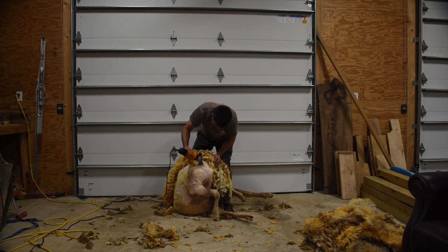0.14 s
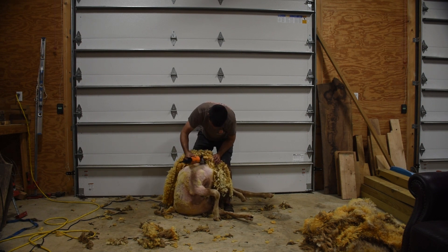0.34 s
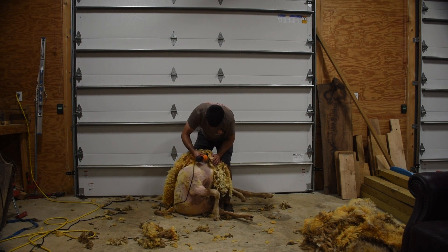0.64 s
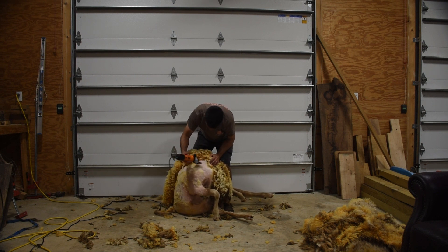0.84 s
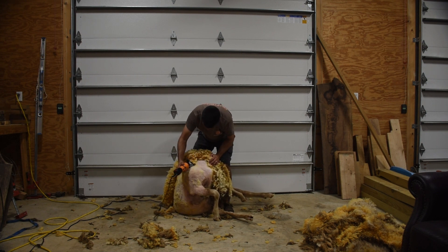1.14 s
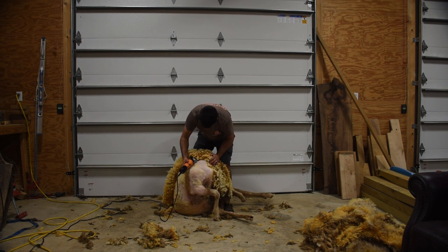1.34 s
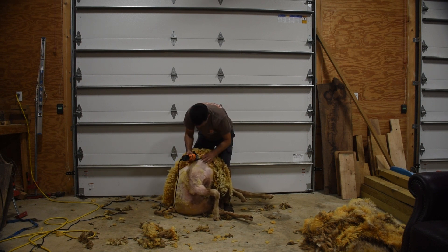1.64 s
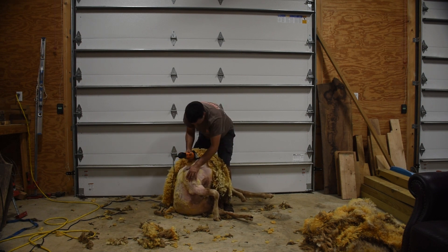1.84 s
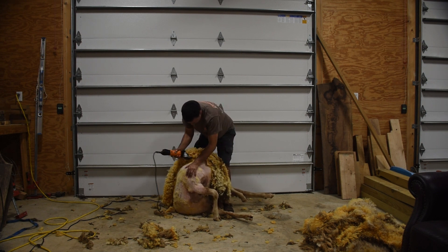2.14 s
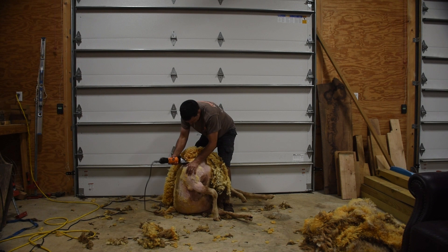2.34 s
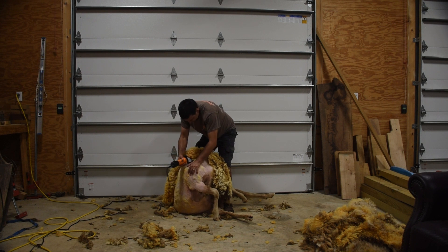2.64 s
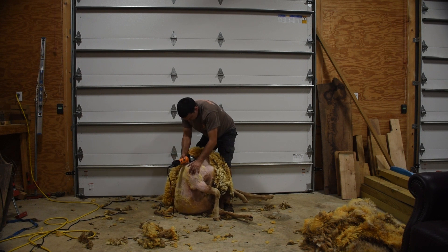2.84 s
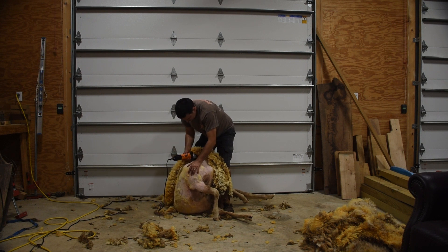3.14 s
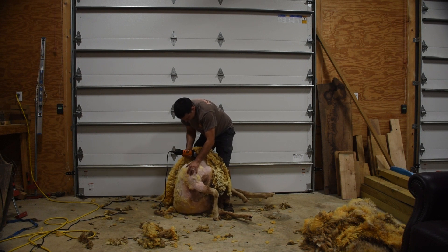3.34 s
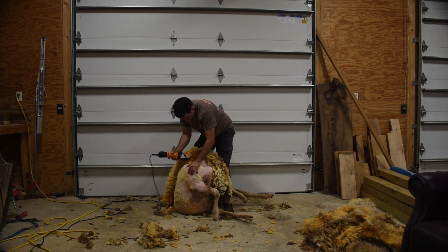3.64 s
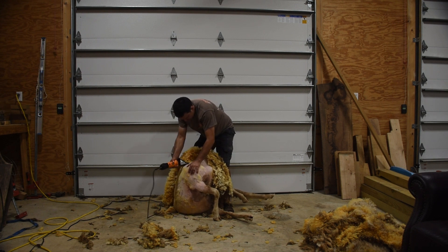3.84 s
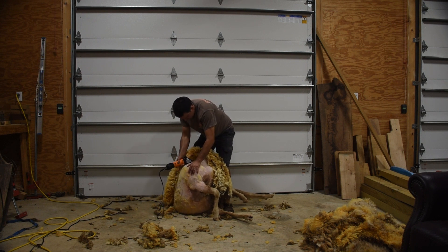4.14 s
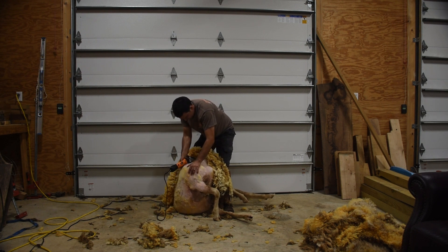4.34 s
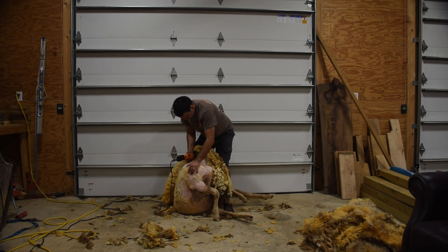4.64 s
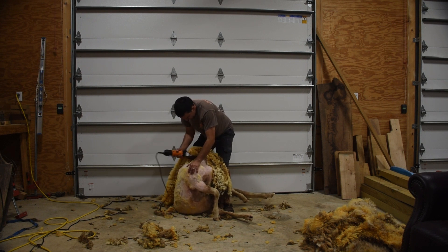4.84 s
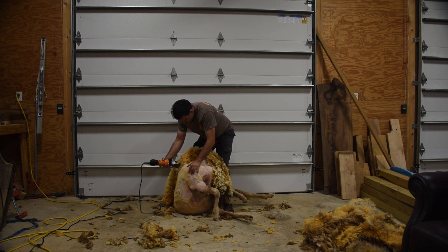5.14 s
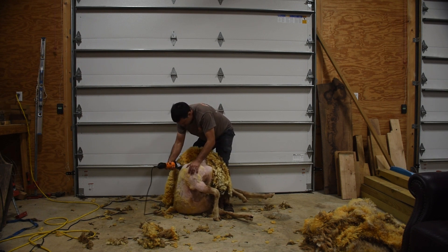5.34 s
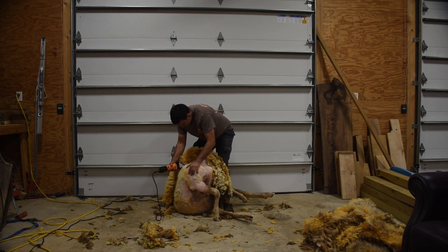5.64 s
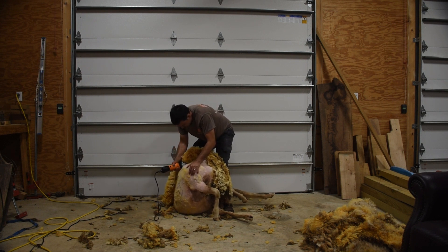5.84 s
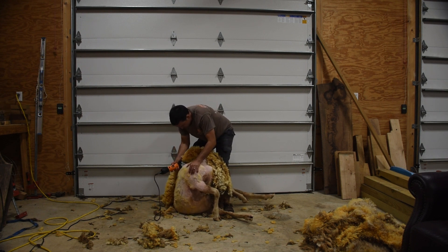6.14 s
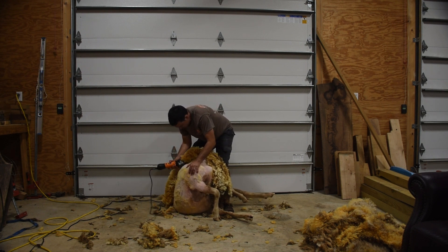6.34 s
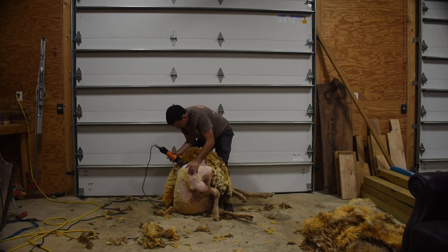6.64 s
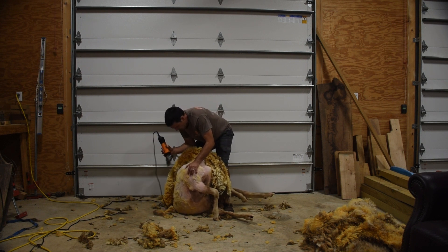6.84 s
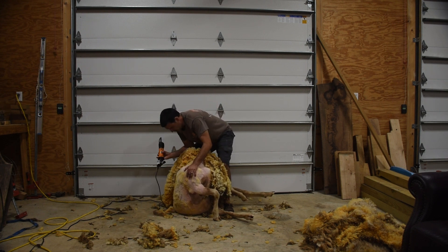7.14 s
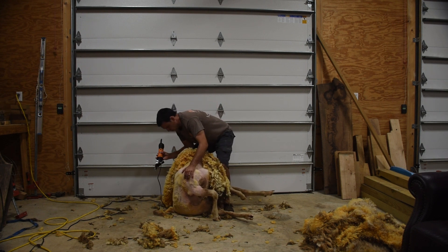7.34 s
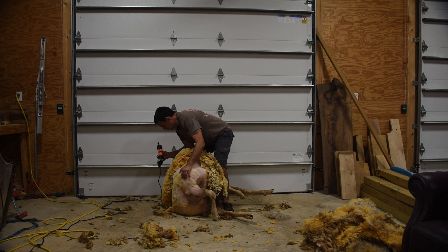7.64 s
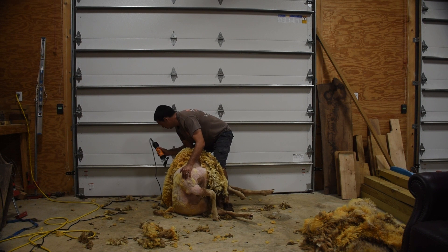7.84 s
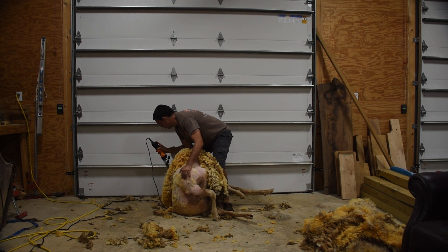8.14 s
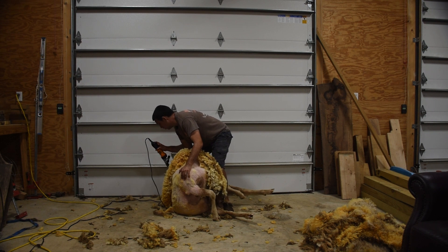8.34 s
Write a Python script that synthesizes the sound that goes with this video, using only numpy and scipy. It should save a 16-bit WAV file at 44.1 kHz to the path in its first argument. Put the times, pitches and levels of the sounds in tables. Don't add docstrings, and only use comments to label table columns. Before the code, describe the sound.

Electric sheep shears run from start to end a few metres away in a hard-floored barn: a piercing gear whine over a bright, scraping metal rattle. The pitch dips slightly under load and recovers, with quick flutters as the tool turns. Two faint hoof thumps come early. In the last half second an animal out of view howls, falling in pitch, and tiny metal ticks rattle.

```python
import sys
import numpy as np
from scipy import signal
from scipy.fft import rfft, irfft, next_fast_len
from scipy.io import wavfile
from scipy.ndimage import uniform_filter1d

SR = 44100
rng = np.random.default_rng(int(sys.argv[2]) if len(sys.argv) > 2 else 0)


def makeup_ratio(level_db):
    decades = np.asarray(level_db, float) / 20
    return 10 ** decades


def store_pcm(level_fs):
    pcm = np.round(np.clip(level_fs, -1, 1) * 32767).astype(np.int16)
    wavfile.write(sys.argv[1], SR, np.atleast_2d(pcm).T)


N = 374842

WHEEL_TEETH, PINION_TEETH = 50, 6
CLATTER_DB = -15

# time in seconds, tooth mesh pitch in Hz.
MOTOR_SPEED = [(0, 2038), (.38, 2073), (.86, 2007), (1.2, 2053), (1.6, 2010), (2.03, 1978), (2.56, 2019),
               (3.27, 1847), (3.5, 1850), (3.88, 1951), (4.14, 1966), (4.52, 1872), (5.1, 1960),
               (5.47, 1991), (5.97, 1926), (6.5, 1968), (7.7, 2041), (8.5, 2033)]
# time in seconds, how far the comb is clear of the wool in dB,
# how far the casing faces us in dB, cutter drag on the crank in dB.
HAND_TURNS = [(0, 2.5, -2.5, 12), (.45, 1, -0.5, 8.5), (1, 5, -8, 2), (1.3, 2.5, 4, 1), (1.6, 4.5, -4, 12),
              (1.85, 3.5, 0.5, -13), (2.2, 1, -1.5, 1), (3.3, 0.5, 2, 3), (3.97, 2.5, -1, 7.5),
              (4.25, 2, 2, 2.5), (4.6, 0, -3, 4), (5.55, 1, 4, 4), (6.35, 2, -4, 6), (6.7, 6.5, -6.5, 2),
              (7.1, 3.5, 0, -12), (7.65, 2, 4, -6), (8.3, 3, -2.5, 7), (8.5, 2, -9, 3)]
STEADY_ORDERS = [9, WHEEL_TEETH / PINION_TEETH, 25, 102]
STEADY_DB = [-58.5, -54.5, -52.5, -42]
# time in seconds, width in seconds, loss in dB.
HOUSING_HIDDEN = [(.09, .025, 7), (.615, .022, 17), (.79, .04, 14), (.945, .02, 11), (1.165, .022, 15),
                  (1.385, .04, 15), (1.74, .065, 15), (1.99, .055, 7), (2.375, .03, 13), (2.51, .035, 10),
                  (2.73, .033, 15), (3.09, .06, 7), (3.31, .1, 15), (3.64, .1, 12), (3.88, .07, 7),
                  (4.075, .03, 10), (4.29, .1, 16), (4.61, .05, 10), (4.79, .055, 16), (5.08, .04, 10),
                  (5.355, .028, 18), (5.57, .07, 7), (5.79, .055, 15), (6.49, .04, 14), (6.81, .09, 21),
                  (7.06, .09, 8), (7.31, .11, 6), (7.88, .2, 2.5), (8.295, .033, 17), (8.47, .07, 18)]
# time in seconds, width in seconds, rise in dB.
THIRD_MESH_AIMED = [
    (.7, .06, 8),
    (1.6, .12, 8),
    (3.29, .09, 8),
    (3.55, .06, 3),
    (4.39, .03, 7),
    (4.76, .08, 5),
    (5.58, .08, 8),
    (6.2, .2, 5),
    (6.9, .1, 8),
    (7.65, .12, 10),
]
# time in seconds, width in seconds, rise in dB.
LOW_TONE_AIMED = [
    (.3, .3, 5),
    (1.35, .15, 6),
    (3.2, .1, 6),
    (4.25, .17, 5),
    (6.0, .25, 9),
]
# time in seconds, width in seconds, rise in dB.
SHAFT_AIMED = [
    (.8, .1, 4.8),
    (2.02, .1, 17),
    (3.0, 0.13, 12),
    (5.25, .1, 9.5),
    (6.6, 0.086, 9.5),
    (8.35, 0.17, 16),
]
# time in seconds, width in seconds, rise in dB.
HANDLE_TURNED = [
    (.8, 0.072, 9),
    (2.55, .2, 8.5),
    (3.4, .1, 7.5),
    (3.8, .1, 7),
    (5.12, .12, 10),
    (5.65, 0.11, 18.5),
    (6.0, 0.19, 14),
    (7.75, .2, 9),
]
# time in seconds, width in seconds, rise in dB.
ABOVE_MESH_AIMED = [
    (.4, .1, 8),
    (2.15, 0.11, 12),
    (2.8, 0.16, 15),
    (6.05, 0.11, 6.9),
    (6.55, .12, 6),
    (8.33, 0.079, 4.4),
]
# time in seconds, width in seconds, rise in dB.
YOKE_TURNED = [
    (1.45, 0.12, 19),
    (7.75, 0.26, 16.4),
]
# time in seconds, width in seconds, rise in dB.
TWICE_MESH_AIMED = [
    (.5, .3, 4),
    (1.0, .06, 6),
    (5.9, .15, 4),
    (7.9, 0.39, 8.4),
]
# pitch in Hz, level in dB.
FAN_TONES = [
    (80.7, -82),
    (247.6, -55),
]

PART_HZ = [1250, 2680, 2900, 4700]
PART_COMB = [0, 0.18, 0.69, 0]
PART_CASING = [0.084, 0, 0.15, 0.22]
PART_SAG = [0.094, -0.57, -0.23, 0.82]
PART_SWAY = [0.15, 0.5, 0.52, 0.74]
# frequency in Hz, level in dB per Hz.
CLATTER_COLOUR = [(40, -40), (300, -27), (650, -16.5), (1350, -11.5), (1800, -14), (2080, -6.5),
                  (2500, -7.5), (3200, -3.5), (3800, -8), (5500, -10), (6800, -18.5), (9400, -31),
                  (12100, -32.5), (15500, -45.5)]
# frequency in Hz, share that repeats (0 to 1).
TURN_REPEAT = [(150, 0.049), (400, 0.19), (1500, 0.13), (2500, 0.26), (3500, 0.053), (6000, 0.036)]
# frequency in Hz, depth (0 to 1).
STROKE_DEPTH = [(1500, 0.04), (3000, 0.076), (6000, 0.18), (12000, 0.17)]
# frequency in Hz, side minus mid in dB.
CLATTER_WIDTH = [(60, -31), (110, -29), (200, -25), (380, -17), (700, -58), (1290, -25), (2380, -13.5),
                 (4400, -17), (8120, -8), (15000, -4.5)]
# pitch in Hz, width in Hz, level in dB.
COMB_MODES = [
    (2360, 100, -13.5),
    (2890, 47, -3),
    (2945, 190, -4),
    (3050, 37, -4.5),
    (3272, 104, -4),
    (3404, 55, -12.5),
    (4210, 79, -13.5),
]

# time in seconds, peak in dB, pitch in Hz.
HOOF_THUMPS = [
    (2.539, -44, 110),
    (2.974, -41, 105),
]
# time in seconds, pitch in Hz, level in dB.
HOWL_PATH = [
    (7.92, 803, -42),
    (7.98, 795, -30),
    (8.12, 778, -28),
    (8.19, 760, -20),
    (8.26, 738, -21),
    (8.3, 725, -15),
    (8.4, 709, -17),
    (8.5, 688, -17),
]
# time in seconds, width in seconds, loss in dB.
HOWL_DIPS = [
    (8.045, 0.025, 16),
    (8.158, 0.0083, 20),
    (8.225, 0.011, 14),
    (8.327, .01, 12),
    (8.4, 0.01, 3),
]
# time in seconds, peak in dB, pitch in Hz.
METAL_TICKS = [
    (8.3804, -28, 14100),
    (8.3944, -31, 13000),
    (8.4084, -36, 12400),
]


def rms_one(x):
    return x / np.sqrt(np.mean(x ** 2) + 1e-20)


def in_time(rows):
    s, *columns = np.transpose(rows)
    return [np.interp(np.arange(N) / SR, s, column) for column in columns]


def at_hz(points, hz):
    table_hz, values = np.array(points).T
    return np.interp(np.log(hz), np.log(table_hz), values)


def drift(rate):
    r = np.exp(-80 * np.pi * rate / SR)
    noise = rng.standard_normal(N // 40 + 2002)
    slow = signal.lfilter([1], [1, -2 * r, r * r], noise)[2000:]
    return np.interp(np.arange(N) / 40, np.arange(len(slow)), rms_one(slow))


def moments(rows):
    t = np.arange(0, N + 64, 64) / SR
    total_db = sum(db * np.exp(-.5 * ((t - s) / width) ** 2) for s, width, db in rows)
    return np.repeat(total_db, 64)[:N]


def tone(turns, level_db, sway_db, wobble):
    phase = 2 * np.pi * (turns + rng.random()) + wobble * drift(9.3)
    return np.sqrt(2) * makeup_ratio(level_db + sway_db * drift(5.4)) * np.sin(phase)


def whine(crank, sag, casing_db, drag_db):
    mesh = WHEEL_TEETH * crank
    mesh_db = -21.5 - moments(HOUSING_HIDDEN) + 1.3 * drift(16)
    out = tone(mesh, mesh_db, sway_db=.7, wobble=.4)
    out += tone(mesh - 2 * crank, -36 + drag_db, sway_db=2.5, wobble=.4)
    third_db = -47.5 + 8 * sag + moments(THIRD_MESH_AIMED)
    out += tone(3 * mesh, third_db, sway_db=2.5, wobble=.8)
    shaft = 2 * WHEEL_TEETH / PINION_TEETH
    minor = [([10], -56, 2.5, LOW_TONE_AIMED),
             ([shaft], -51.5, 1, SHAFT_AIMED),
             ([52, 54], -39, -2, ABOVE_MESH_AIMED),
             ([27], -53.5, 1, HANDLE_TURNED),
             ([42], -49, 0, YOKE_TURNED),
             ([98, 100], -40.5, -1, TWICE_MESH_AIMED)]
    for orders, free_db, per_sag, aimed in minor:
        level_db = free_db + per_sag * sag + moments(aimed)
        for order in orders:
            out += tone(order * crank, level_db, sway_db=2.5, wobble=.4)
    for order in range(32, 36):
        out += tone(order * crank, -43.5 + 2.23 * casing_db, sway_db=2.5, wobble=.4)
    for order, level_db in zip(STEADY_ORDERS, STEADY_DB):
        out += tone(order * crank, level_db, sway_db=4, wobble=.7)
    return out


def far_fan():
    t = np.arange(N) / SR
    return sum(tone(hz * t, level_db, sway_db=3, wobble=.8) for hz, level_db in FAN_TONES)


def clatter_parts(sag, comb_db, casing_db):
    parts = []
    for per_comb, per_casing, per_sag, sway_db in zip(PART_COMB, PART_CASING, PART_SAG, PART_SWAY):
        level_db = per_comb * comb_db + per_casing * casing_db + per_sag * sag
        parts.append((level_db + sway_db * drift(6.2))[::64])
    parts = np.array(parts)
    return parts - parts.mean(axis=1, keepdims=True)


def repeating(crank, memory):
    steps = 512
    turns = rng.standard_normal((int(crank[-1]) + 42, steps))
    turns = signal.lfilter([1], [1, -np.clip(memory, 0, .98)], turns, axis=0)[40:]
    return rms_one(np.interp(crank * steps, np.arange(turns.size), turns.ravel()))


def comb_ring(drive):
    out = 0
    for k, (hz, width_hz, level_db) in enumerate(COMB_MODES):
        r, w = np.exp(-np.pi * width_hz / SR), 2 * np.pi * hz / SR
        mode = signal.lfilter([1, 0, -1], [1, -2 * r * np.cos(w), r * r], drive)
        out = out + (-1) ** k * makeup_ratio(level_db + 1.6 * drift(4.0)) * rms_one(mode)
    return rms_one(out)


def near_echoes(x):
    t = np.arange(SR // 20) / SR
    answers = rng.standard_normal((2, len(t))) * np.exp(-t / .012)
    answers = answers / np.sqrt(np.sum(answers[0] ** 2))
    first, second = signal.oaconvolve(x[None], answers, axes=1)[:, :N]
    angle = 2.5 * drift(1.2)
    return x + makeup_ratio(-11) * (np.cos(angle) * first + np.sin(angle) * second)


def clatter(crank, parts, patchy_db):
    stroke = 2 * np.pi * 2 * crank
    pulse = np.cos(stroke) + 0.69 * np.cos(2 * stroke + 0.47)
    pulse += 0.25 * np.cos(3 * stroke + 3.0) + 0.76 * np.cos(4 * stroke + 0.26)
    white = rng.standard_normal((2, 2, N))
    loops = [repeating(crank, memory=0.74) for _ in white]
    edges = 40 * 2 ** (np.arange(27) / 3)
    together = drift(9.0)
    out = np.zeros((2, N))
    for k, (low, high) in enumerate(zip(edges, edges[1:])):
        hz = np.sqrt(low * high)
        share = np.clip(at_hz(TURN_REPEAT, hz), 0, 1)
        mid, side = white[k % 2]
        mid = np.sqrt(1 - share) * mid + np.sqrt(share) * loops[k % 2]
        band = signal.butter(2, [low, high], "band", fs=SR, output="sos")
        pair = signal.sosfilt(band, [mid, side])
        place = np.interp(np.log(hz), np.log(PART_HZ), np.arange(len(parts)))
        weights = np.maximum(0, 1 - abs(np.arange(len(parts)) - place))
        reach = min(1, hz / 600) * min(1, 7000 / hz)
        moving_db = np.repeat(weights @ parts, 64)[:N] * reach
        flicker_db = patchy_db * (drift(4.8) + 0.71 * together)
        out += pair * makeup_ratio(moving_db + flicker_db) * (1 + at_hz(STROKE_DEPTH, hz) * pulse)
    size = next_fast_len(N)
    hz = np.maximum(np.arange(size // 2 + 1) * SR / size, 1)
    shape = makeup_ratio(at_hz(CLATTER_COLOUR, hz) + [0 * hz, at_hz(CLATTER_WIDTH, hz)])
    mid, side = irfft(rfft(out, size) * shape, size)[:, :N]
    gain = makeup_ratio(CLATTER_DB) / np.sqrt(np.mean(mid ** 2))
    swell_db = 3.0 * np.repeat(parts[2], 64)[:N]
    ring = makeup_ratio(-24.5 + swell_db) * comb_ring(0.8 * white[0, 0] + 0.6 * loops[1])
    mid = rms_one(near_echoes(gain * mid + ring)) * makeup_ratio(CLATTER_DB)
    return np.array([mid + gain * side, mid - gain * side])


def barn(x):
    t = np.arange(SR) / SR
    fade = makeup_ratio(-60 * t / .7) * (t > .008)
    answer = rng.standard_normal((2, SR)) * fade
    answer = answer / np.sqrt(np.sum(answer ** 2, axis=1, keepdims=True))
    mid, side = signal.fftconvolve(x[None], answer, axes=1)[:, :N]
    return mid + makeup_ratio(-12) * side * np.array([[1], [-1]])


def knocks(events, t60, rough):
    out, t = np.zeros(N), np.arange(SR // 4) / SR
    for s, peak_db, hz in events:
        wander = rough * np.cumsum(rng.standard_normal(len(t))) / 6
        ring = makeup_ratio(peak_db - 60 * t / t60) * np.sin(2 * np.pi * hz * t + wander)
        at = round(s * SR)
        out[at:at + len(t)] += ring[:N - at]
    return out


def howl():
    hz, level_db = in_time(HOWL_PATH)
    start_s = HOWL_PATH[0][0]
    swell = np.clip((np.arange(N) / SR - start_s) / .05 + 1, 0, 1)
    return swell * tone(np.cumsum(hz) / SR, level_db - moments(HOWL_DIPS), sway_db=.3, wobble=.15)


def scene():
    mesh_hz = uniform_filter1d(in_time(MOTOR_SPEED)[0], round(.2 * SR), mode="nearest")
    sag = (2050 - mesh_hz) / 100
    comb_db, casing_db, drag_db = in_time(HAND_TURNS)
    crank = np.cumsum(mesh_hz) / SR / WHEEL_TEETH
    tones = whine(crank, sag, casing_db, drag_db) + far_fan()
    scrape = clatter(crank, clatter_parts(sag, comb_db, casing_db), patchy_db=-0.02)
    tones += knocks(HOOF_THUMPS, t60=.15, rough=0)
    call = howl()
    tones += knocks(METAL_TICKS, t60=.025, rough=1.2)
    wet = makeup_ratio(-17) * barn(tones + makeup_ratio(-10) * call)
    placed_call = call * makeup_ratio(np.array([[-.1], [.1]]))
    return tones + placed_call + wet + scrape


def band_limit(x):
    return signal.sosfilt(signal.butter(12, 15670, fs=SR, output="sos"), x)


def record(dry):
    left, right = dry * makeup_ratio(np.array([[-0.52], [0.52]]))
    mid_cut = signal.butter(2, 75, "high", fs=SR, output="sos")
    side_cut = signal.butter(2, 130, "high", fs=SR, output="sos")
    mid = signal.sosfilt(mid_cut, (left + right) / 2)
    side = signal.sosfilt(side_cut, (left - right) / 2)
    pair = np.array([mid + side, mid - side])
    mix = 1.601 * np.tanh(pair / 1.598)
    return band_limit(mix)


dry = scene()
out = record(dry)
store_pcm(out)
```